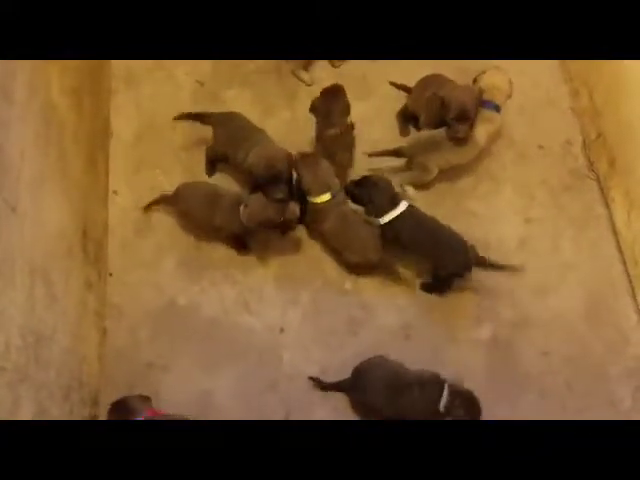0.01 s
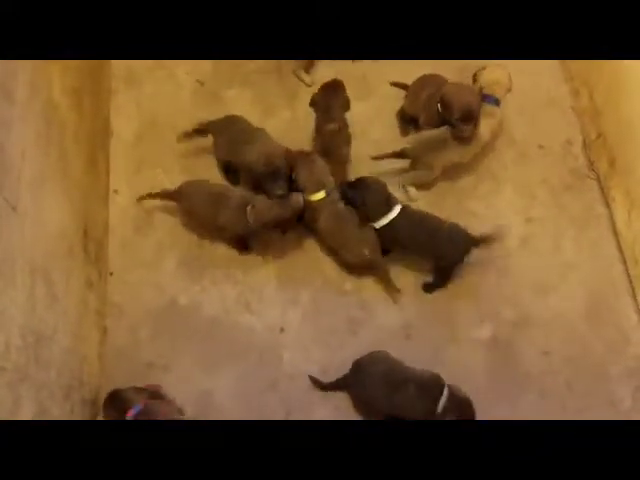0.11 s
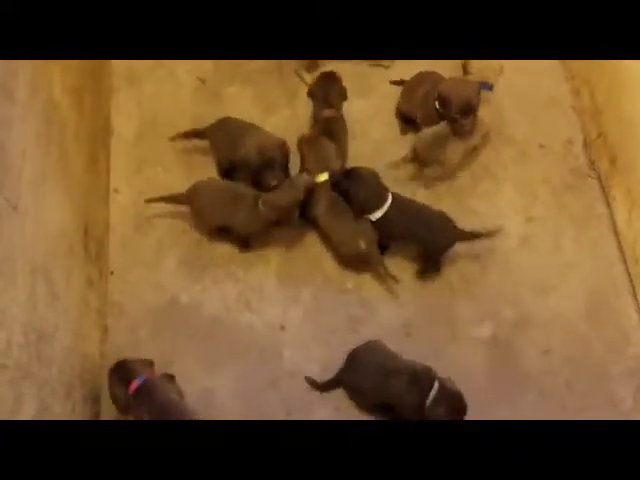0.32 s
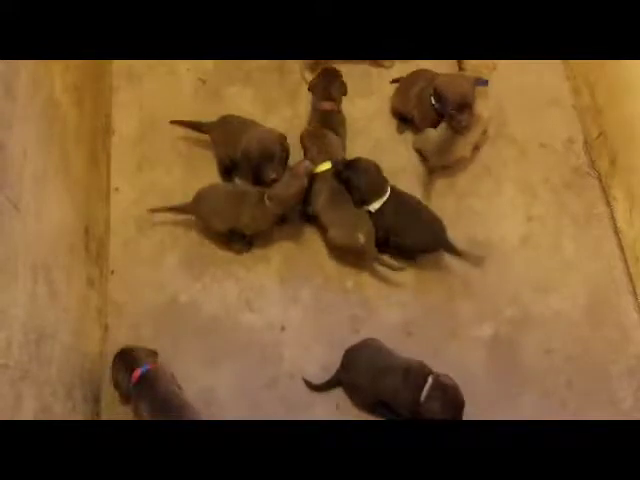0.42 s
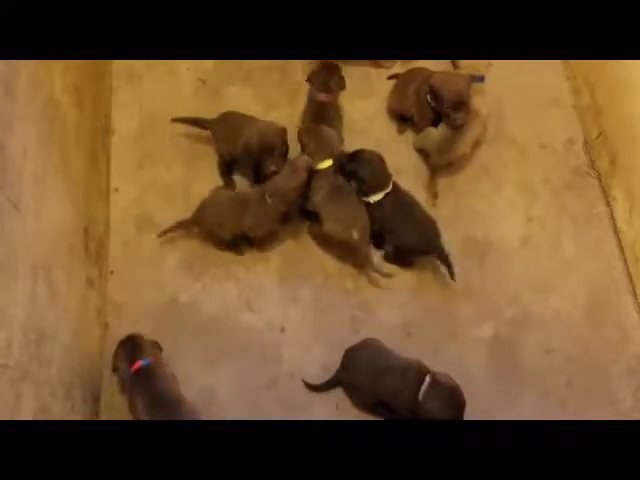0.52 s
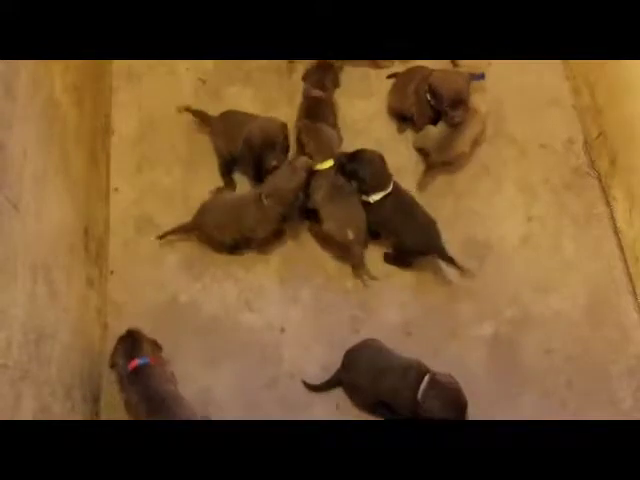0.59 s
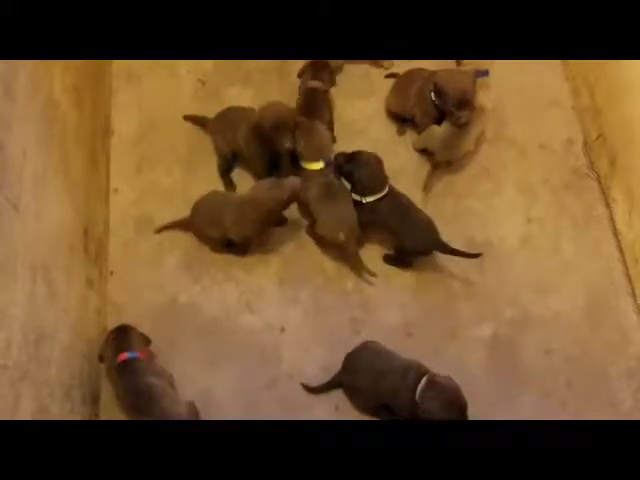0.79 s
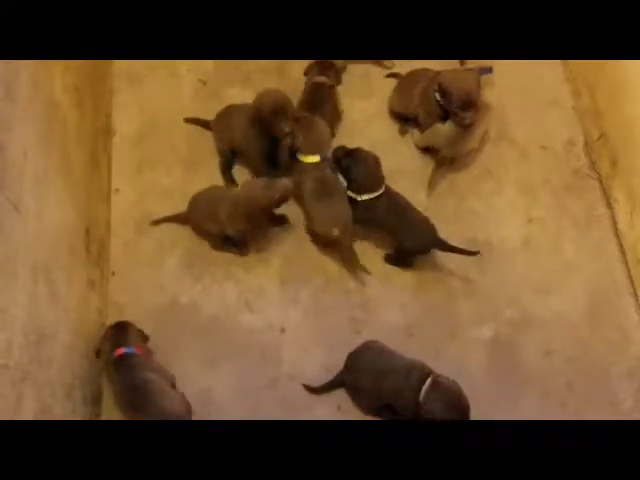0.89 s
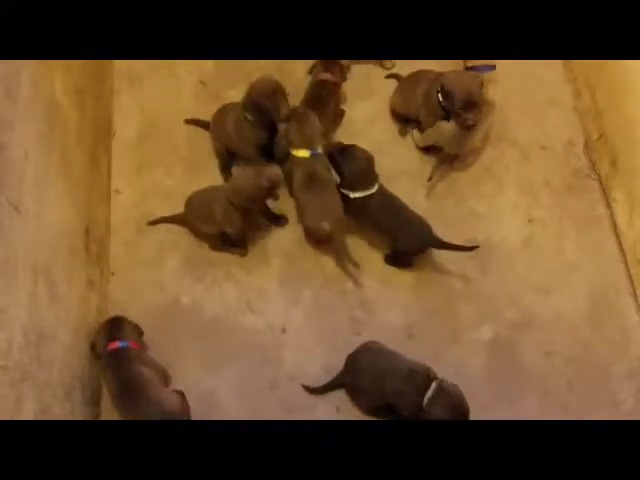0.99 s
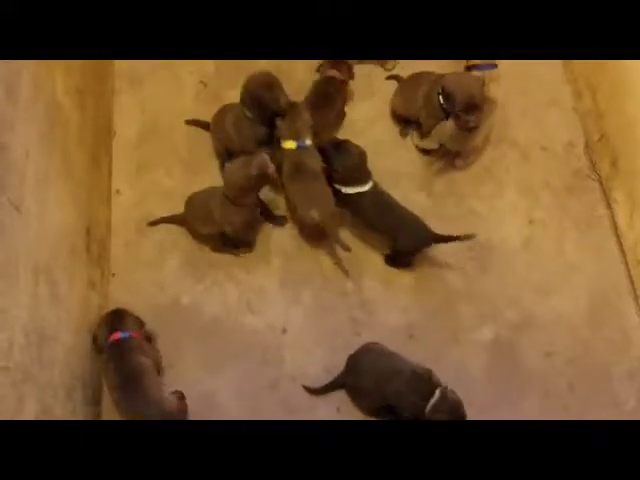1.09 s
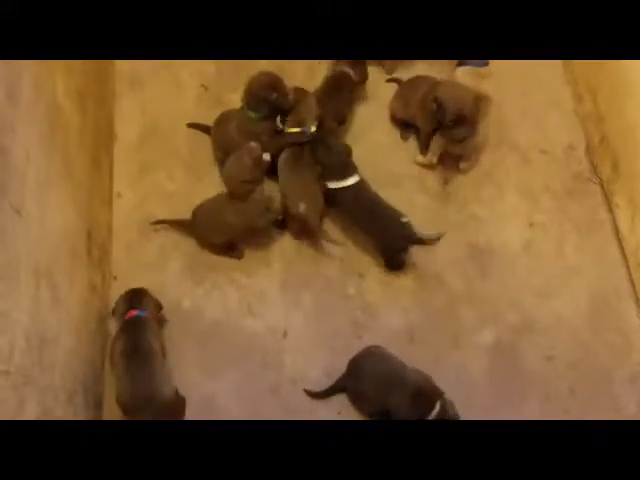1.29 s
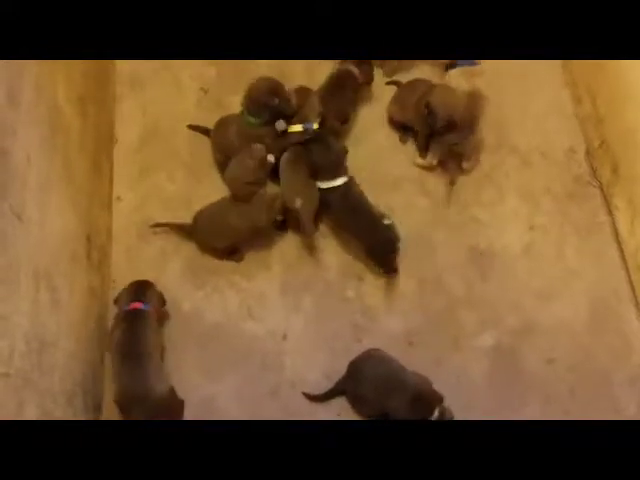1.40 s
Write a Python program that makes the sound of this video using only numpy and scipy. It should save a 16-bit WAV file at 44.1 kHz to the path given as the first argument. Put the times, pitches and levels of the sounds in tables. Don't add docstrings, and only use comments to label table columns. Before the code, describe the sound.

A puppy yelps once, a sharp squeal climbing, turning hoarse and sagging in a bare concrete pen

```python
import sys
import numpy as np
from scipy import signal
from scipy.fft import rfft, irfft, next_fast_len
from scipy.io import wavfile
from scipy.ndimage import uniform_filter1d, minimum_filter1d

SR = 44100
rng = np.random.default_rng(int(sys.argv[2]) if len(sys.argv) > 2 else 0)


def master_out(mix):
    frames = np.transpose(np.atleast_2d(mix))
    ceiling = np.clip(frames, -1, 1)
    pcm = np.round(ceiling * 32767).astype(np.int16)
    wavfile.write(sys.argv[1], SR, pcm)


def makeup_ratio(level_db):
    decades = np.asarray(level_db, float) / 20
    return 10 ** decades


N = 61740

# frequency_hz, density_db (per Hz)
AIR_SPECTRUM = [(25, -12), (145, -5.5), (353, -14.5), (600, -14.5), (1200, -24), (3000, -29), (7500, -38.5),
                (14000, -38.5)]
HUM_DB = -61
BOOM_HZ, BOOM_WIDTH_HZ, BOOM_DB = 150, 29, -64
# frequency_hz, alike_share
LIKENESS = [(25, 0.86), (150, 0.86), (350, 1), (800, .4), (3000, 0.059)]

# start_s, length_s, level_db, centre_hz, width_octaves
PAW_SCUFFS = [(.0, 0.054, -61, 1980, 2.9), (0.102, .085, -51, 889, 2.03), (.110, 0.2, -70.5, 6116, 1.5),
              (.21, 0.11, -58, 300.7, 1.7), (.36, 0.21, -59.5, 343.2, 2.2), (0.826, 0.081, -63, 2462, 1.7),
              (.845, 0.036, -71.5, 7867, 0.68), (.855, 0.035, -56, 342, 1.2), (1.048, .025, -70, 8200, 0.4),
              (1.10, 0.091, -68.5, 1335, 2.1), (1.2, 0.0667, -73.5, 999, 2.79),
              (1.29, .05, -65.5, 3000, .7), (1.29, 0.055, -67, 1467, 1.3), (1.365, .05, -62, 1446, 1.75)]
GRIT_PER_S = 500
# start_s, length_s, pitch_hz, level_db
WHIMPERS = [
    (0.0093, 0.024, 840, -55.5),
    (0.019, 0.032, 1984, -61),
    (0.5, .07, 635, -49.5),
    (.52, 0.029, 690, -47),
    (0.457, 0.046, 880, -52.5),
]
# start_s, peak_db, pitch_hz
FLOOR_THUMPS = [
    (0.158, -48, 105),
    (0.873, -57, 190.4),
    (1.093, -45.5, 150),
    (1.287, -48, 150),
    (1.354, -52, 150),
]
THUMP_T60_S = 0.098

# time_s, pitch_hz, level_db, roughness_0_to_1, overtones_db (above the mouth)
CLIMB = [
    (.226, 883, -32.5, 0, -13.5),
    (.244, 922.4, -7, 0, -22),
    (.250, 1157, -15.5, 0, 1),
    (.266, 1149, -17, .25, 8),
    (.288, 1350, -16, 0.22, 7.5),
    (.304, 1302, -11.5, 0.1, -2.5),
    (.320, 1411, -17, .04, -4.5),
    (.329, 1518, -13.5, 0.2, -3.5),
    (.345, 1623, -11.5, 0, -5),
]
# start_s, length_s, level_db, centre_hz, width_octaves
VOICE_CRACK = [
    (.262, 0.031, -23, 1636, .6),
]
# time_s, pitch_hz, level_db, roughness_0_to_1, overtones_db
SAG = [
    (.328, 1310, -29.5, .15, -8.5),
    (.348, 1271, -25, .15, -4.5),
    (.378, 1212, -9.5, 0.2, -3.5),
    (.405, 1197, -16.5, 0.5, -5),
    (.425, 1126, -12.5, .2, -6),
    (.460, 1126, -17, 0.4, -11),
    (.485, 942.8, -30.5, 0.63, -5.5),
    (.505, 1005, -21.5, 0.77, -6),
    (.54, 813.4, -45.5, 0.88, -10),
]
# time_s, pitch_hz, level_db, roughness_0_to_1, overtones_db
HOARSE_TOP = [
    (.340, 1586, -25.5, 0.2, -14.5),
    (.355, 1687, -8.5, 0.5, -7.5),
    (.372, 1583, -15.5, 0.8, -8),
    (.395, 1499, -12, 0.8, -15),
    (.420, 1414, -15.5, .6, -12),
]
JITTER, JITTER_HZ, SHIMMER_HZ, RELEASE_S = .05, 150, 253.9, 0.004
HOARSER_PER_OVERTONE = .04
BREATH_DB = -4.5
MOUTH_TOP_HZ = 2685
THIN_BELOW_HZ, THIN_OVER_HZ = 1500, 119
# frequency_hz, gain_db
THROAT = [(700, -42), (930, -15), (1550, 1.5), (2050, -0.5), (2450, 7.5), (2870, -8), (3080, -6.5),
          (6700, -14.5)]
# centre_hz, width_hz, gain_db
MOUTH = [(5300, 500, 0), (6700, 600, 4), (7950, 1200, -6.5), (9030, 400, 5.5), (10562, 400, -7.5),
         (11800, 900, 8.5)]
THROAT_FALL_DB_PER_KHZ = 3
EDGE_HZ, EDGE_DB_PER_KHZ, EDGE_DEPTH_DB = 9500, 43.5, 18

# frequency_hz, t60_s
PEN_DECAY = [(500, .5), (1400, 0.42), (3500, 0.3), (9000, .33)]
PEN_DB, PEN_BUILD_S, FIRST_ECHO_S = 2, .015, .006
# left_lag_s, right_lag_s, level_db
WALL_ECHOES = [
    (.0031, 0.0026, -7.5),
    (.033, .0325, -7.5),
]
# frequency_hz, difference_db
PORTS = [(500, -0.5), (1500, 2.5), (2500, 0), (4500, -3.5), (8000, -13.5), (12000, -4)]
LEFT_LAG_S = .0001
LIMIT, LOW_CUT_HZ, CUTOFF_HZ = .95, 30, 15500


def rms_one(x):
    return x / np.sqrt(np.mean(x ** 2) + 1e-20)


def at_hz(points, hz):
    table_hz, value = np.transpose(points)
    return np.interp(np.log(hz), np.log(table_hz), value)


def drift(rate_hz):
    pole = np.exp(-2 * np.pi * rate_hz / SR)
    settle = 20000
    noise = rng.standard_normal(N + settle)
    return rms_one(signal.lfilter([1], [1, -2 * pole, pole * pole], noise)[settle:])


def band(x, low_hz, high_hz):
    sos = signal.butter(2, [low_hz, min(high_hz, .45 * SR)], "band", fs=SR, output="sos")
    return signal.sosfilt(sos, x)


def bands():
    edges = 20 * 2 ** np.arange(0, 10.1, .5)
    return zip(edges, edges[1:], np.sqrt(edges[1:] * edges[:-1]))


def pair(noises, hz):
    alike = np.clip(at_hz(LIKENESS, hz), 0, 1)
    shared = np.sqrt(1 + alike) * noises[0]
    opposed = np.sqrt(1 - alike) * noises[1] * [[1], [-1]]
    return (shared + opposed) / np.sqrt(2)


def hum():
    air, white = 0, rng.standard_normal((2, 2, N + SR))
    for k, (low, high, hz) in enumerate(bands()):
        noise = pair(band(white[k % 2], low, high)[:, SR:], hz)
        air = air + makeup_ratio(at_hz(AIR_SPECTRUM, hz) + 1.5 * drift(24)) * noise
    half = BOOM_WIDTH_HZ / 2
    boom = band(rng.standard_normal(N + SR), BOOM_HZ - half, BOOM_HZ + half)[SR:]
    return makeup_ratio(HUM_DB) * rms_one(air) + makeup_ratio(BOOM_DB) * rms_one(boom)


def bursts(rows):
    t, out = np.arange(N) / SR, np.zeros(N)
    for start, length, db, hz, octaves in rows:
        white = rng.standard_normal(N)
        grain_gain = makeup_ratio(4.3 * np.minimum(rng.exponential(1, N), 2))
        grit = white * (1 + grain_gain * (rng.random(N) < GRIT_PER_S / SR))
        half = 2 ** (octaves / 2)
        u = np.maximum(t - start, 0) / length
        envelope = np.minimum(25 * u, 1) * np.exp(-(1.245 * u) ** 4)
        out += makeup_ratio(db) * rms_one(band(grit, hz / half, hz * half)) * envelope
    return out


def whimpers():
    t, out = np.arange(N) / SR, np.zeros(N)
    for start, length, hz, db in WHIMPERS:
        phase = 2 * np.pi * np.cumsum(hz * (1 + 0.029 * drift(33))) / SR
        swell = np.sin(np.pi * np.clip((t - start) / length, 0, 1))
        out += makeup_ratio(db) * np.sin(phase) * swell
    return out


def thumps():
    out = np.zeros(N)
    for start, db, hz in FLOOR_THUMPS:
        t = np.maximum(np.arange(N) / SR - start, 0)
        onset = np.minimum(t * hz, 1)
        out += makeup_ratio(db - 60 * t / THUMP_T60_S) * np.sin(2 * np.pi * hz * t) * onset
    return out


def throat_db(hz):
    bumps = sum(db * np.exp(-((hz - centre) / width) ** 2) for centre, width, db in MOUTH)
    edge = np.clip(EDGE_DB_PER_KHZ * (hz - EDGE_HZ) / 1000, 0, EDGE_DEPTH_DB)
    fall = THROAT_FALL_DB_PER_KHZ * np.maximum(hz - THROAT[-1][0], 0) / 1000
    return at_hz(THROAT, np.maximum(hz, 1)) - fall - edge + bumps


def voice(rows, thin_db):
    t = np.arange(N) / SR
    times, *columns = np.transpose(rows)
    hz, db, rough, over_db = [np.interp(t, times, c) for c in columns]
    rough = np.clip(rough, 0, 1)
    hz = uniform_filter1d(hz, size=150) * (1 + JITTER * rough * drift(JITTER_HZ))
    phase = 2 * np.pi * np.cumsum(hz) / SR
    out = makeup_ratio(BREATH_DB) * np.sqrt(rough) * rng.standard_normal(N) * (1 + np.cos(phase))
    thinness = np.clip((THIN_BELOW_HZ - hz) / THIN_OVER_HZ, 0, 1)
    power = 0
    for k in range(1, 15):
        above_mouth = np.clip((k * hz - MOUTH_TOP_HZ) / 200, k > 2, 1)
        gain = makeup_ratio(over_db * above_mouth + (k == 1) * thin_db * thinness)
        share = np.clip(rough + HOARSER_PER_OVERTONE * max(k - 2, 0), 0, .9)
        rate_hz = SHIMMER_HZ * np.sqrt(k)
        shake = np.sqrt(share) * (drift(rate_hz) + 1j * drift(rate_hz)) / np.sqrt(2)
        out = out + gain * np.real((np.sqrt(1 - share) + shake) * np.exp(1j * k * phase))
        power = power + (gain * makeup_ratio(throat_db(k * hz))) ** 2 / 2
    gate = (t > times[0]) * np.exp(-np.maximum(t - times[-1], 0) / RELEASE_S)
    out = makeup_ratio(db) * gate * out / np.sqrt(uniform_filter1d(power, size=300))
    return irfft(rfft(out) * makeup_ratio(throat_db(np.fft.rfftfreq(N, 1 / SR))), N)


def yelp():
    return voice(CLIMB, thin_db=-14) + bursts(VOICE_CRACK) + voice(SAG, thin_db=-2) + voice(HOARSE_TOP, thin_db=2.5)


def pen(x):
    t = np.arange(SR // 2 + SR // 4) / SR
    white, tail = rng.standard_normal((2, 2, len(t))), 0
    for k, (low, high, hz) in enumerate(bands()):
        t60 = at_hz(PEN_DECAY, hz)
        die = makeup_ratio(-60 * t / t60) / np.sqrt(t60 * SR / np.log(1e6))
        tail = tail + pair(band(white[k % 2], low, high), hz) * die
    build = 1 - np.exp(-np.maximum(t - FIRST_ECHO_S, 0) / PEN_BUILD_S)
    tail = makeup_ratio(PEN_DB) * tail * build
    size = next_fast_len(N + len(t))
    hz = np.maximum(np.fft.rfftfreq(size, 1 / SR), 1)
    early = np.exp(-2j * np.pi * hz * LEFT_LAG_S * np.array([[1], [0]]))
    for *lag, db in WALL_ECHOES:
        early = early + makeup_ratio(db) * np.exp(-2j * np.pi * hz * np.array(lag)[:, None])
    port = makeup_ratio(at_hz(PORTS, hz) / 2 * np.array([[1], [-1]]))
    return irfft(rfft(x, size) * (early + rfft(tail, size)) * port, size)[:, :N]


def scene():
    return hum() + thumps() + pen(bursts(PAW_SCUFFS) + whimpers() + yelp())


def top_cut(x):
    return signal.sosfilt(signal.butter(12, 15470, fs=SR, output="sos"), x)


def record(dry):
    x = signal.sosfilt(signal.butter(2, LOW_CUT_HZ, "high", fs=SR, output="sos"), dry)
    gain = np.minimum(1, LIMIT / (np.abs(x).max(axis=0) + 1e-9))
    x = x * uniform_filter1d(minimum_filter1d(gain, size=401), size=401)
    x = signal.sosfilt(signal.cheby2(12, 40, CUTOFF_HZ + 300, fs=SR, output="sos"), x)
    return top_cut(x)


dry = scene()
out = record(dry)
master_out(out)
```